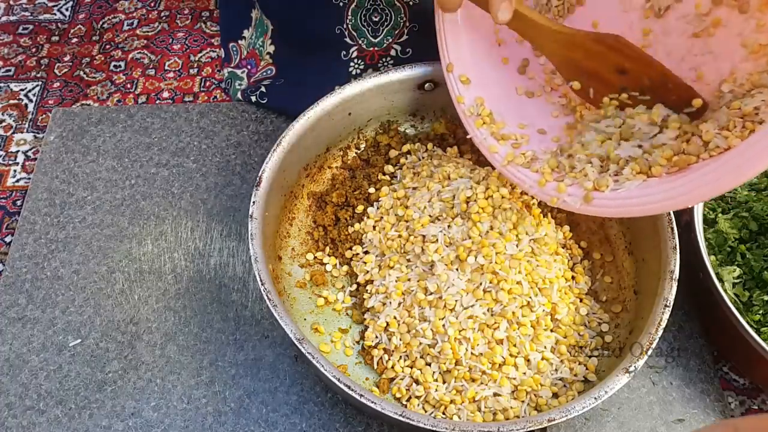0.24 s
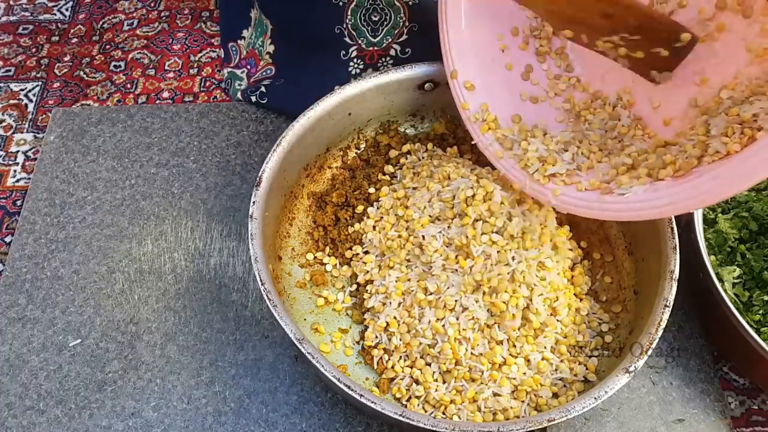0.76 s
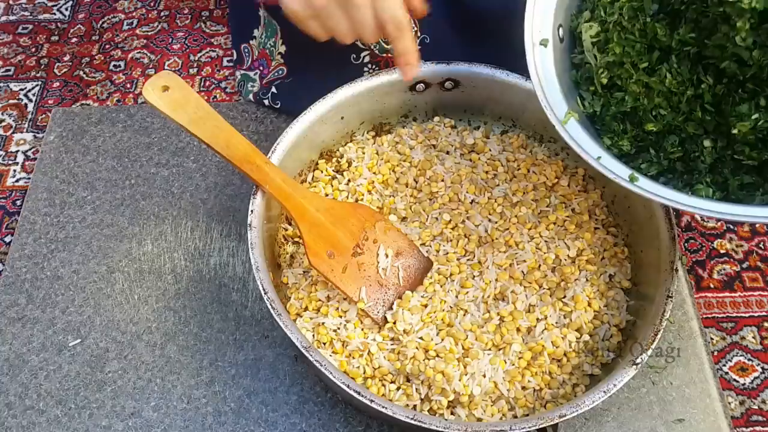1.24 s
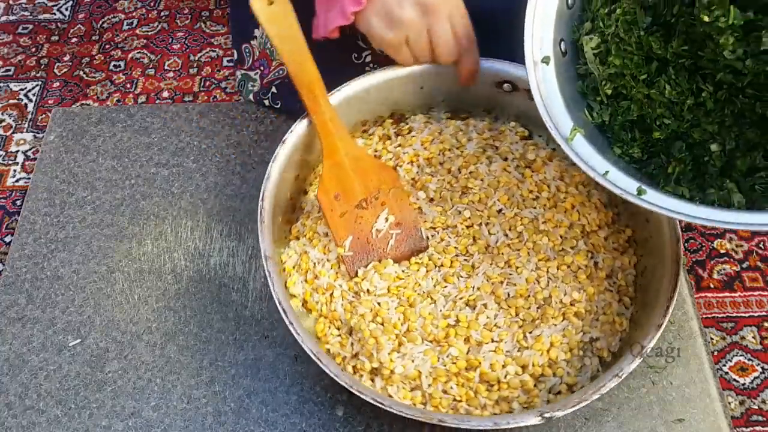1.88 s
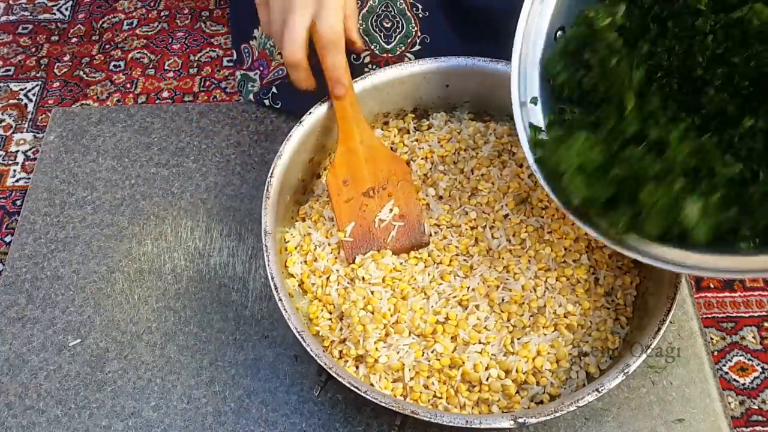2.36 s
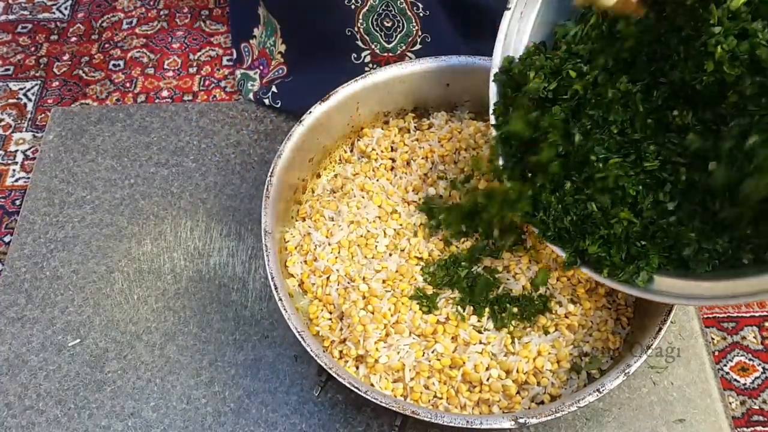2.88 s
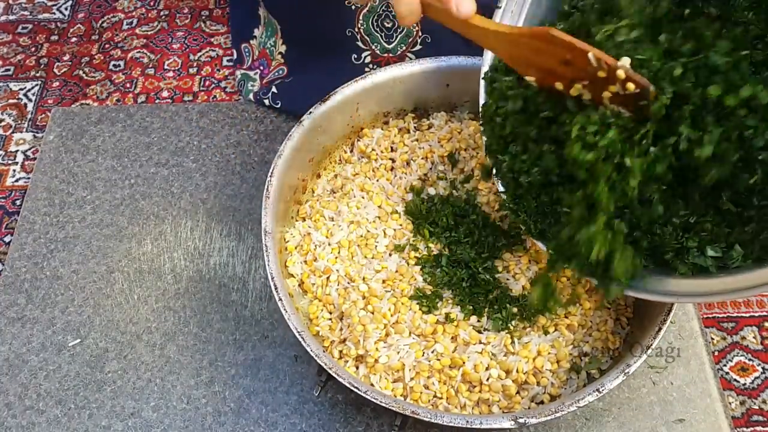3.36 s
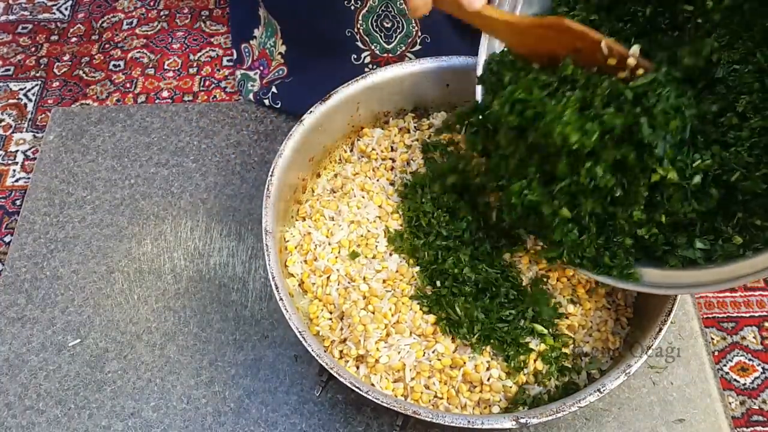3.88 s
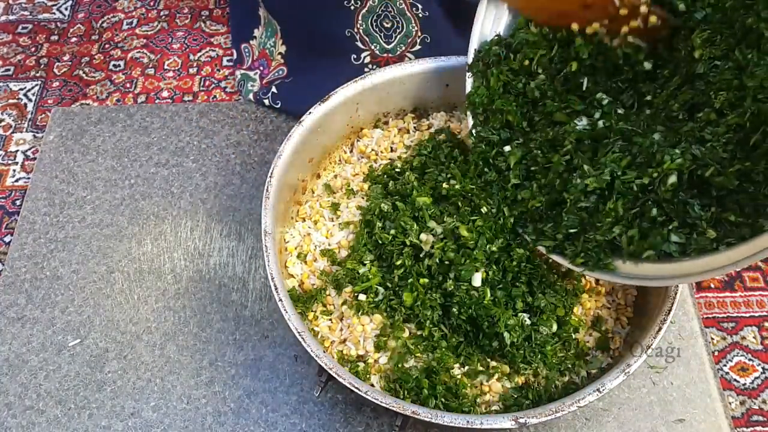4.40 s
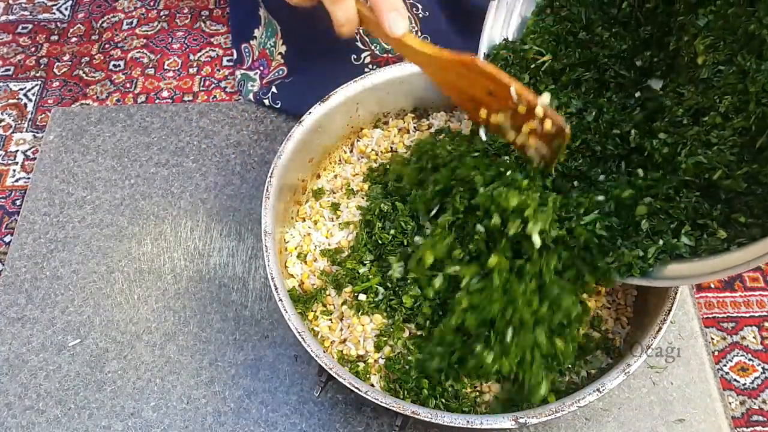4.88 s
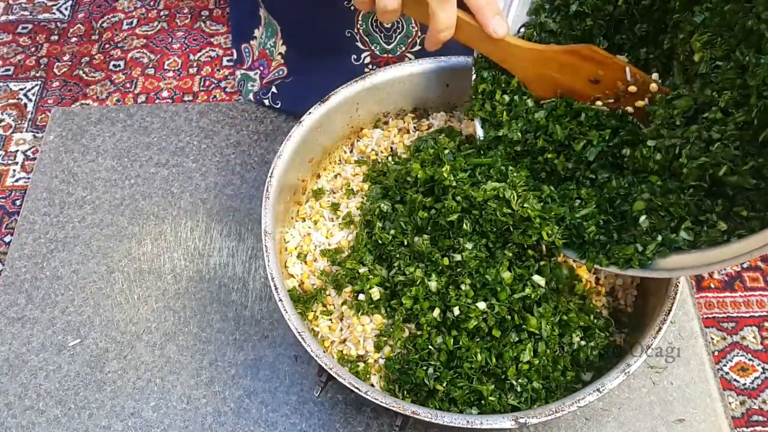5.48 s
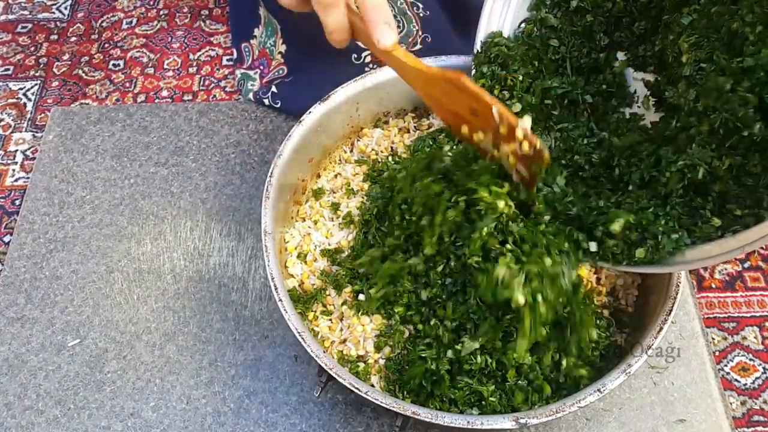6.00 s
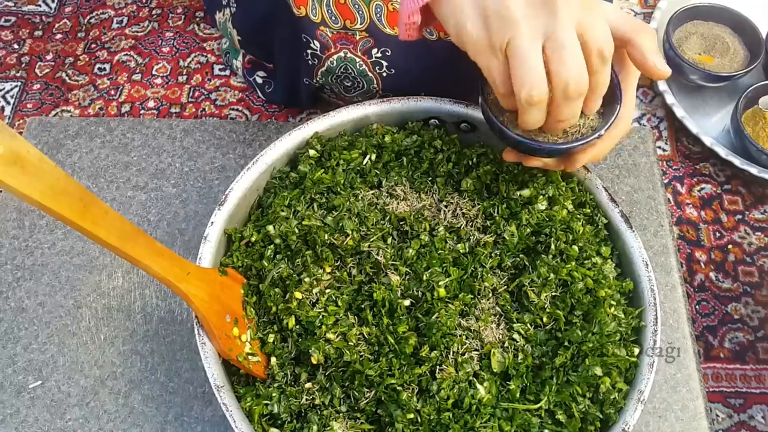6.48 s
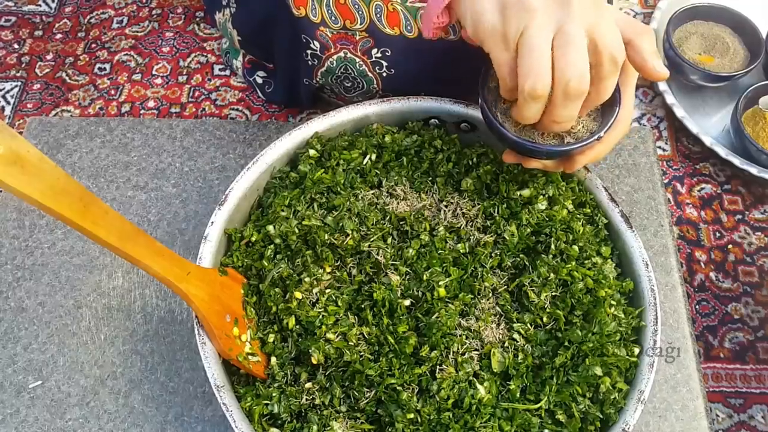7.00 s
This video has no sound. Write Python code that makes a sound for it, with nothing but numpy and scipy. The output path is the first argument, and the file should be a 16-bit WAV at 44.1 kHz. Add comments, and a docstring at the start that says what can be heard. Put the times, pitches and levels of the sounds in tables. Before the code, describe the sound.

A wooden spoon sweeps rustling grains across plastic, knocks a pot, then taps and scrapes a herb-filled metal bowl before faint spice sprinkling.

```python
"""A wooden spoon scrapes grains from a plastic basin into a metal pot, then pushes chopped herbs out of a metal bowl:
random tiny impacts are filtered and swelled into strokes, while bursts of force ring the modes of bowl and pot.
Single grains and stalks snap as short crunches, and fingers sprinkle spice as a softer rain of impacts.
Low bumps and rumble of handling come and go over filtered noise, the quiet hiss of a small, carpeted room."""
import sys
import numpy as np
from scipy import signal
from scipy.fft import rfft, irfft, next_fast_len
from scipy.io import wavfile

SR = 44100
rng = np.random.default_rng(int(sys.argv[2]) if len(sys.argv) > 2 else 0)


def wav_record(signal):
    """Record a signal, one row per channel, as 16-bit PCM in the file named by sys.argv[1]."""
    frames = np.transpose(np.atleast_2d(signal))
    bounded = np.clip(frames, -1, 1)
    # unit amplitude maps onto the largest positive 16-bit level
    quanta = np.round(bounded * 32767).astype(np.int16)
    wavfile.write(sys.argv[1], SR, quanta)


N = 319725
TIME = np.arange(N) / SR  # seconds
TOUCH_S = 0.018  # a stroke makes and breaks contact this quickly; the room tone drops as fast
CRACKLE_PER_S = 45  # rate of crunches in each of the three streams of grains()


def amp(db):
    """Decibels to gain."""
    return 10 ** (np.asarray(db) / 20)


def unit(x):
    """Scale to an rms of one."""
    return x / np.sqrt(np.mean(x ** 2))


def colour(x, points):
    """Causal minimum-phase filter that follows (Hz, dB) points, built by folding the cepstrum."""
    size = 4096
    hz, db = np.transpose(points)
    log_hz = np.log(np.fft.rfftfreq(size, 1 / SR) + 1)
    cepstrum = irfft(np.log(amp(np.interp(log_hz, np.log(hz), db))))
    cepstrum[1:size // 2] *= 2
    cepstrum[size // 2 + 1:] = 0
    response = irfft(np.exp(rfft(cepstrum)))
    return np.apply_along_axis(signal.oaconvolve, -1, x, response)[..., :x.shape[-1]]


def ring(x, modes):
    """Damped sines (Hz, width Hz, dB) driven by a force; little is radiated below the first one."""
    out = 0
    for hz, width, db in modes:
        radius = np.exp(-np.pi * width / SR)
        turn = 2 * np.pi * hz / SR
        feed = [0, 2 * (1 - radius) * np.sin(turn)]
        feedback = [1, -2 * radius * np.cos(turn), radius * radius]
        out = out + amp(db) * signal.lfilter(feed, feedback, x)
    return signal.sosfilt(signal.butter(2, 0.87 * modes[0][0], "high", fs=SR, output="sos"), out)


def delay(x, s):
    """The same sound a little later, by turning the phase of its spectrum."""
    size = next_fast_len(len(x) + 1024)
    turn = np.exp(-2j * np.pi * np.fft.rfftfreq(size, 1 / SR) * s)
    return irfft(rfft(x, size) * turn, size)[:len(x)]


def add(track, s, sound):
    """Mix a sound in at a time."""
    start = max(int(s * SR), 0)
    track[start:start + len(sound)] += sound[:N - start]


def pan(pair, points):
    """Tilt two channels against each other by (Hz, left minus right dB)."""
    tilted = []
    for x, side in zip(pair, (1, -1)):
        tilted.append(colour(x, [(hz, side * db / 2) for hz, db in points]))
    return np.array(tilted)


def contact(grit, decay_s, size=6000):
    """A push, then a crunch that builds and dies as the surfaces chatter."""
    age = np.arange(size) / SR / decay_s
    force = rng.standard_normal(size) * np.sqrt(age) * np.exp(-age)
    force = signal.sosfilt(signal.butter(1, 2000, "high", fs=SR, output="sos"), force)
    force *= grit / np.linalg.norm(force)
    force[:3] += np.hanning(5)[1:4] / 2  # the push
    return force


def grains(rate, spread_db, own_db=-5):
    """Random tiny impacts, many weak and a few strong: one stream in both channels, one more in each alone."""
    sizes = amp(spread_db * np.minimum(rng.exponential(size=(3, N)), 4))
    impacts = (rng.random((3, N)) < rate / SR) * sizes * rng.choice([-1, 1], (3, N))
    return impacts[0] + amp(own_db) * impacts[1:]


def crackle(rate, points):
    """Sparse crunches at random moments: noise under envelopes that swell and fade within milliseconds."""
    age = np.arange(600) / SR
    envelope = age * np.exp(-age / .001)
    bursts = signal.oaconvolve(grains(rate, spread_db=2, own_db=-20), [envelope], axes=1)[:, :N]
    return unit(colour(bursts * rng.standard_normal(N), points))


def clumps(rate, depth_db):
    """Uneven gain: loose stuff gives way in small lumps."""
    moments = np.arange(0, TIME[-1] + 1, 1 / rate)
    return amp(depth_db * np.interp(TIME, moments, rng.standard_normal(len(moments))))


def strokes(rows, rise_db, fall_db):
    """Gain over time: each stroke touches, swells by rise_db to its hardest moment, eases by fall_db, lifts off."""
    gain = np.zeros(N)
    for start, hardest, end, db in rows:
        touching = np.clip(np.minimum(TIME - start, end - TIME) / TOUCH_S, 0, 1)
        swell_db = db - np.interp(TIME, [start, hardest, end], [rise_db, 0, fall_db])
        gain += touching * amp(swell_db)
    return gain


def air():
    """Room tone that drops abruptly near the end: the lows are shared by both channels, the hiss is not."""
    # Spectrum of the room tone. Each row: frequency in Hz, level in dB.
    tone_colour = [(15, -23.5), (25, -28.5), (43, -19.5), (96, -0.5), (126, -4.5), (198, -9.5),
                   (227, -11.5), (253, -10.5), (340, -13.5), (523, -19), (895, -22.5), (1380, -30),
                   (4260, -36), (7700, -48.5), (15500, -44.5)]
    # Stereo tilt of the room tone. Each row: frequency in Hz, left minus right in dB.
    tone_pan = [(60, -2), (110, 2.5), (200, 1), (380, 1.5), (700, 1.5), (1290, -0.5), (2380, 1), (4400, -2),
                (8120, 1.5), (15000, 2)]
    level_db = -57.5
    hush_s, hush_db = 6.15, -9.5  # it stays low from here on
    mid = colour(rng.standard_normal(N), tone_colour)
    side = colour(rng.standard_normal(N), tone_colour)
    side = colour(side, [(60, -30), (300, -7.5), (1500, 2.5), (6000, 0)])
    pair = np.array([mid + side, mid - side]) / np.std(mid)
    hush = np.clip((TIME - hush_s) / TOUCH_S, 0, 1)
    return pan(pair, tone_pan) * amp(level_db + hush_db * hush)


def room(x, size=22050):
    """Early scatter and the diffuse tail of a small soft room, unrelated in the two channels."""
    t60_s, tail_db, near_db = 0.44, -17, -8.5
    t = np.arange(size) / SR
    fade_in = np.clip(t / 0.00558 - 1, 0, 1)
    tails = rng.standard_normal((2, size)) * amp(-60 * t / t60_s) * fade_in
    # floor, knees and vessels nearby scatter the first milliseconds
    near = rng.standard_normal((2, size)) * np.exp(-t / 0.0054) * (t > .002)
    response = amp(tail_db) * unit(tails) + amp(near_db) * unit(near)
    response = colour(response / np.sqrt(size), [(200, 6), (700, 2.5), (2500, 0.5), (6000, -3), (12000, 1)])
    return signal.oaconvolve(x, response, axes=1)[:, :N]


def handling():
    """Soft low-passed pushes and a low rumble of tiny impacts, mostly on the right."""
    # Soft bumps of heaped grain and handled vessels.
    # Each row: start in seconds, strength in dB, upper edge in Hz.
    bump_rows = [(0.321, 4, 218), (.471, 2, 218), (.630, 2.5, 300), (.936, 10.5, 181), (1.008, 14, 184),
                 (1.051, 10, 229), (1.077, 16, 260), (1.091, 17, 317), (6.183, 4, 196), (6.409, 3.5, 251),
                 (6.500, 4, 285), (6.579, 6.5, 317), (6.600, 0, 425), (6.715, 10, 213), (6.745, -1, 369.2),
                 (6.799, -2, 387), (7.103, 0.5, 199.8)]
    # Vessels are shifted and tipped. Each row: start, hardest moment and end in seconds, level in dB.
    shift_rows = [(-.02, .04, 0.071, -44.5), (.28, .63, 0.99, -44.5), (.96, 1.08, 1.186, -34),
                  (1.16, 1.25, 1.27, -47), (6.14, 6.19, 6.42, -45), (6.3, 6.45, 6.61, -43.5),
                  (6.54, 6.58, 6.76, -41), (6.87, 6.97, 7.46, -49)]
    # Spectrum of the rumble. Each row: frequency in Hz, level in dB.
    rumble_colour = [(25, -24), (60, 6.5), (110, 7.5), (180, 1), (280, -7), (450, -21.5), (900, -57)]
    bumps = np.zeros(N)
    for s, db, edge_hz in bump_rows:
        push = signal.sosfilt(signal.butter(4, edge_hz, fs=SR, output="sos"), signal.unit_impulse(4000))
        add(bumps, s, amp(db) * push)
    bumps = signal.sosfilt(signal.butter(2, 75, "high", fs=SR, output="sos"), bumps)
    rumble = unit(colour(grains(rate=790, spread_db=2.5, own_db=4.5), rumble_colour))
    rumble = rumble * strokes(shift_rows, rise_db=4.5, fall_db=6.5)
    left, right = bumps + rumble
    left_db = np.interp(TIME, [1.3, 6.1], [-7, -12])
    return np.array([left * amp(left_db), right])


def spice_pinches(lumps):
    """Fingers rub dry spice over the pot: a soft, lumpy rain of tiny impacts."""
    # Each row: start, hardest moment and end in seconds, level in dB.
    pinch_rows = [(6.2, 6.29, 6.6, -72), (6.84, 6.93, 7.27, -71.5)]
    # Spectrum of the spice. Each row: frequency in Hz, level in dB.
    spice_colour = [(200, -10), (650, 2.5), (1400, -1), (2500, -3.5), (5000, -8.5), (7500, -23),
                    (15000, -19)]
    spice = unit(colour(grains(rate=3000, spread_db=2.5) * lumps, spice_colour))
    return spice * strokes(pinch_rows, rise_db=6.5, fall_db=6.5)


def ticks():
    """Single grains and stalks snap under the spoon, each a crunch of a few milliseconds."""
    # Each row: start in seconds, strength in dB, treble in dB.
    tick_rows = [(.015, -20.5, 13), (.040, -22.5, 0.5), (.099, -20, -1.5), (.147, -23.5, -5),
                 (.358, -26, -6), (.365, -18.5, -5.5), (.421, -27, -21), (.453, -31, 26), (.524, -25, -12),
                 (.55, -23.5, 7), (.632, -16.5, -13), (.731, -16, -3.5), (.898, -24, -12), (1.043, -27, 5),
                 (1.195, -17.5, 26), (1.253, -16.5, -13), (1.883, -29, -6), (1.921, -18, -9),
                 (1.943, -22.5, -4), (2.313, -35, 20), (2.565, -23.5, 4.5), (5.361, -27, 10),
                 (5.445, -25, 9)]
    out = np.zeros(N)
    for s, db, treble_db in tick_rows:
        shape = [(200, -10.0), (550, 3.0), (1000, -3.0), (1600, 4), (2200, -0.5),
                 (3200, treble_db / 2 + 0.5), (5500, treble_db - 18),
                 (7500, 1.3 * treble_db - 38.5), (15000, treble_db - 36.5)]
        snap = colour(contact(grit=6, decay_s=.0014), shape)
        add(out, s, amp(db) * snap / np.linalg.norm(snap))
    return out


def knocks():
    """Spoon and basin knock on the pot full of grain: brief forces ring broad, quickly damped modes."""
    # Each row: start in seconds, strength in dB, extra level at 4 kHz in dB.
    knock_rows = [(.013, -3.5, -8), (.038, -4, -5.5), (.061, -5.5, -2), (1.0019, 13, -2), (1.1180, 8, -19),
                  (1.1311, -5, -2.5), (1.9205, 0, -7)]
    # Modes of the knocks. Each row: frequency in Hz, width in Hz, level in dB.
    knock_modes = [(247, 145, -3), (502, 120, -2.5), (613, 73, -2), (912, 150, -5.5), (1390, 164, -4),
                   (2600, 450, -11.5), (3680, 150, -17.5), (4900, 200, -56)]
    out = np.zeros(N)
    for s, db, hard_db in knock_rows:
        force = colour(contact(grit=0.42, decay_s=0.00056), [(1200, 0), (4000, hard_db)])
        add(out, s, amp(db) * ring(force, knock_modes))
    return out


def spoon_taps():
    """Blows ring the herb-damped metal bowl and the spoon; the pot below bounces the sound back at once."""
    # The spot and hardness of each blow weigh the modes. Each row: start in seconds, strength in dB,
    # then extra level in dB at 630 Hz, 1 kHz, 1.6 kHz and 5 kHz.
    tap_rows = [(2.7309, 13.5, 1, 3, 4.5, -4), (2.8698, 11, 2, 2.5, 3.5, -4.5),
                (3.6022, 8.5, 1.5, -1.5, 1.5, -4.5), (4.021, 19, 4.5, -4.5, 13, 13),
                (4.0315, 17, 5.5, 4, 11.5, -5.5), (4.3329, 8.5, 1.5, 0.5, 10.5, 0.5),
                (4.9059, 17, 0.5, 12, 9.5, 4.5), (5.181, 3.5, 0.5, 15.5, -1, -13)]
    # Modes of the bowl. Each row: frequency in Hz, width in Hz, left level in dB, right level in dB.
    bowl_modes = [(397, 15, -21, -28.5), (590, 55, -9, -2.5), (653, 45, -14, -4), (725, 100, -1, -3.5),
                  (953, 30, -12.5, -11.5), (1043, 120, -16, -14.5), (1183, 110, -17, -15.5),
                  (1453, 68, -8.5, -11.5), (1375, 41, -11, -12), (1795, 130, -23, -18.5),
                  (2121.7, 61, -19.5, -17.5), (2494, 55, -21.5, -30), (2790, 180, -29, -29.5),
                  (3131, 110, -40.5, -27), (3414, 46, -37.5, -30.5), (3865, 92, -29.5, -23),
                  (4229, 110, -39, -31), (4914, 97, -39, -23), (5180, 91, -42.5, -34.5),
                  (5662, 89, -40, -17.5), (9070, 482, -50, -55.5)]
    # The wooden spoon's own clack. Each row: frequency in Hz, width in Hz, level in dB.
    spoon_modes = [(847, 450, -21), (2400, 1000, -30.5)]
    # How well the bowl radiates. Each row: frequency in Hz, level in dB.
    radiation = [(200, -12.5), (380, -2), (460, -16.5), (570, 0.5), (6100, 0.5), (7300, -14.5),
                 (10000, -3.5), (15000, -10.5)]
    echo_s, echo_gain = .00288, .55
    out = np.zeros((2, N))
    for s, db, body_db, rim_db, wall_db, hard_db in tap_rows:
        weights = [(420, 0), (630, body_db), (760, 0), (1000, rim_db), (1600, wall_db), (5000, hard_db)]
        # the load of herbs shifts, and the modes with it
        shifts = 1 + .008 * rng.standard_normal(len(bowl_modes))
        for side in range(2):
            modes = [(hz * shift, width, gains[side])
                     for shift, (hz, width, *gains) in zip(shifts, bowl_modes)]
            force = colour(contact(grit=0.66, decay_s=0.004), weights)
            add(out[side], s, amp(db) * (ring(force, modes) + ring(force, spoon_modes)))
    echo = np.array([delay(x, echo_s) for x in out])
    return colour(out + echo_gain * echo, radiation)


def wall_rubs():
    """Wood rubs the wall of the bowl, sticking and slipping into its resonances."""
    # Each row: start, hardest moment and end in seconds, level in dB.
    rub_rows = [(4.69, 4.73, 4.75, -55), (5.32, 5.36, 5.385, -52)]
    # Each row: frequency in Hz, width in Hz, level in dB.
    rub_modes = [(990, 55, 9), (1415, 130, -15.5), (1800, 200, -12)]
    rub = unit(ring(grains(rate=1400, spread_db=1.5, own_db=-12), rub_modes))
    return rub * strokes(rub_rows, rise_db=14, fall_db=10.5)


def bowl_drags():
    """The bowl drags on the rim of the pot; the metal sticks and slips into its resonances."""
    # Each row: start, hardest moment and end in seconds, level in dB.
    drag_rows = [(3.0, 3.11, 3.175, -45.5), (3.165, 3.18, 3.26, -47.5), (3.31, 3.36, 3.42, -64.5),
                 (3.52, 3.57, 3.8, -62)]
    # Each row: frequency in Hz, width in Hz, level in dB.
    drag_modes = [(335, 50, -13), (609, 33, -1.5), (686, 69.3, -0.5), (1080, 107, -21.5), (1340, 68, -16.5),
                  (5680, 150, -25)]
    drag = unit(ring(grains(rate=1500, spread_db=1.5, own_db=-9.5), drag_modes))
    return drag * strokes(drag_rows, rise_db=16.5, fall_db=12)


def herb_pushes():
    """Pushes through the chopped herbs: leaves slip in countless even impacts while stalks crackle."""
    # Each row: start, hardest moment and end in seconds, level in dB.
    push_rows = [(2.29, 2.34, 2.5, -68), (2.555, 2.568, 2.605, -58), (3.0, 3.12, 3.57, -71.5),
                 (3.5, 3.97, 4.64, -73.5), (4.52, 4.64, 5.12, -69), (5.28, 5.37, 5.62, -63)]
    # Spectra of leaves and stalks. Each row: frequency in Hz, level in dB.
    leaf_colour = [(600, 2), (1200, 12.5), (2500, 3.5), (4000, 6.5), (5600, -1), (7000, -17),
                   (12000, -11.5)]
    stalk_colour = [(600, -16), (2000, -9), (4400, -4.5), (5500, 4), (7000, -7), (12000, -11)]
    leaves = unit(colour(grains(rate=6000, spread_db=0.5), leaf_colour))
    stalks = amp(-7) * crackle(CRACKLE_PER_S, stalk_colour)
    return (leaves + stalks) * strokes(push_rows, rise_db=6.5, fall_db=10.5)


def heap_slide():
    """The spoon slides out of the heap, its tiny impacts exciting a set of resonances."""
    # Each row: start, hardest moment and end in seconds, level in dB.
    slide_rows = [(1.95, 2.05, 2.183, -53)]
    # Each row: frequency in Hz, width in Hz, level in dB.
    slide_modes = [(1420, 220, 10), (1760, 300, -14), (2360, 200, 14.5), (2760, 270, 11), (3530, 420, -2),
                   (4100, 270, -9), (5400, 420, -31)]
    slide = unit(ring(grains(rate=4000, spread_db=4.5), slide_modes))
    return slide * strokes(slide_rows, rise_db=4.5, fall_db=14)


def grain_sweeps(lumps):
    """The spoon sweeps grain over plastic: it slips in lumps of tiny impacts while loose grains bounce."""
    # Each row: start, hardest moment and end in seconds, level in dB.
    sweep_rows = [(-.05, .1, 0.74, -57), (.43, .70, 0.87, -51), (.87, 1.04, 1.12, -59),
                  (1.11, 1.262, 1.28, -51)]
    # Spectra of slipping and of loose grains. Each row: frequency in Hz, level in dB.
    slip_colour = [(290, -35), (500, -4.5), (602, -5), (735, -11.5), (898, -10.5), (1080, -20), (1320, 2),
                   (1510, -6), (1770, -3), (2020, -12), (2780, -9.5), (3440, -12.5), (5260, -23),
                   (7740, -33), (12000, -33.5), (15600, -76), (22000, -120)]
    bounce_colour = [(300, -20), (1100, -10.5), (1700, 2), (2600, -1.5), (5000, -12), (7500, -26),
                     (15000, -33)]
    slipping = unit(colour(grains(rate=6500, spread_db=6.0) * lumps, slip_colour))
    slipping = slipping * strokes(sweep_rows, rise_db=14, fall_db=14.5)
    bouncing = amp(-7.5) * crackle(CRACKLE_PER_S, bounce_colour)
    bouncing = bouncing * strokes(sweep_rows, rise_db=5, fall_db=5.5)
    return slipping + bouncing


def scraping():
    """All rubbing and sliding together; grain sweeps and spice share one uneven gain."""
    lumps = clumps(rate=130, depth_db=2.5)
    strokes_mix = grain_sweeps(lumps) + herb_pushes() + spice_pinches(lumps)
    strokes_mix = strokes_mix + heap_slide() + bowl_drags() + wall_rubs()
    # soft grain and leaves give off little above 6 kHz
    return colour(strokes_mix, [(5900, 0.5), (7300, -9.5), (12000, -5.5)])


def scene():
    """The work happens a little to the right, so its direct sound reaches the left channel later."""
    # Stereo tilt of the work. Each row: frequency in Hz, left minus right in dB.
    work_pan = [(100, -11), (400, 1), (1000, -3), (2200, 4), (3500, -0.5), (5500, -12), (8000, 2),
                (14000, -8.5)]
    left_lag_s = 0.00013
    work = spoon_taps() + pan(knocks() + ticks() + scraping(), work_pan)
    direct = np.array([delay(work[0], left_lag_s), work[1]])
    return direct + room(work) + handling() + air()


def record(dry):
    """A steep elliptic low-pass cuts the top above 15.8 kHz."""
    return signal.sosfilt(signal.ellip(10, .2, 70, 15800, fs=SR, output="sos"), dry)


dry = scene()
out = record(dry)
wav_record(out)
```